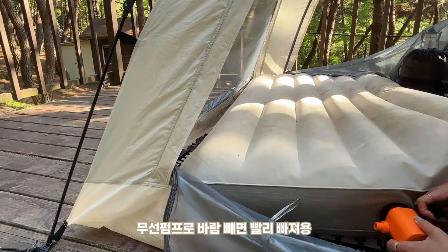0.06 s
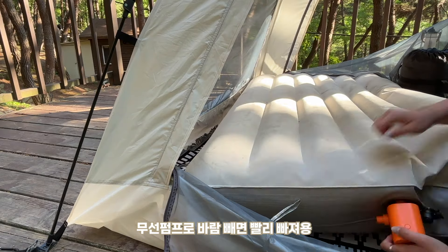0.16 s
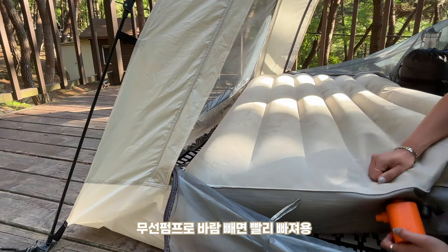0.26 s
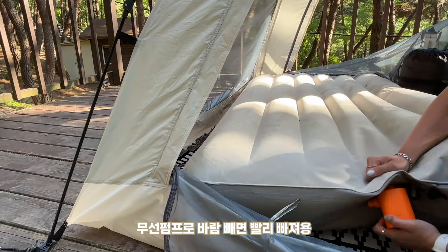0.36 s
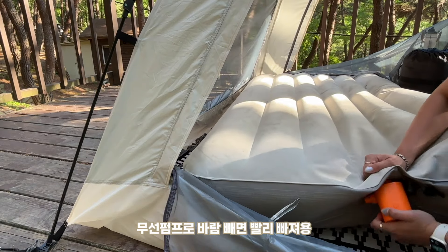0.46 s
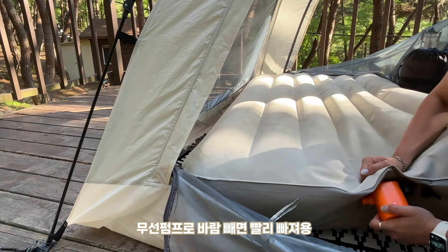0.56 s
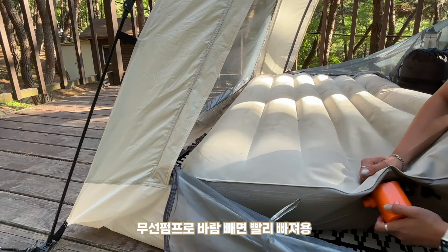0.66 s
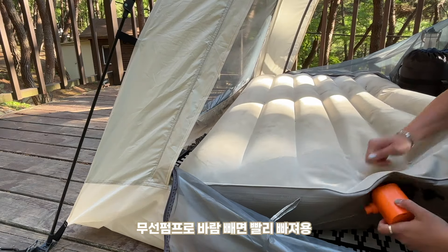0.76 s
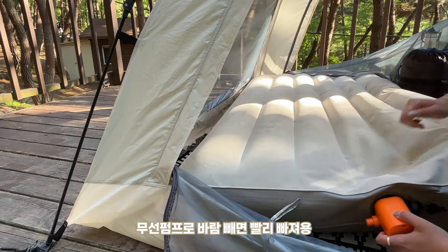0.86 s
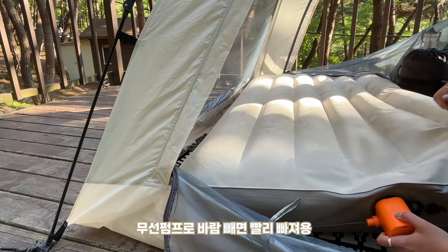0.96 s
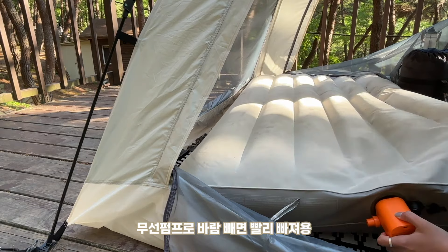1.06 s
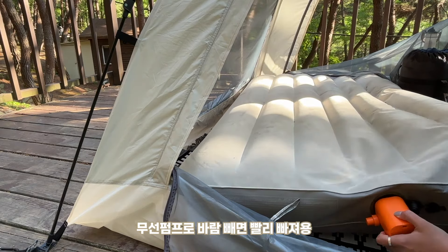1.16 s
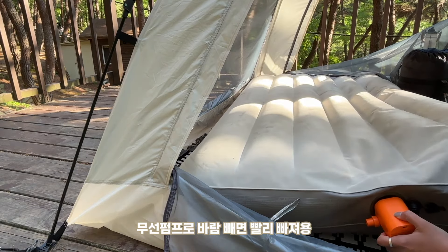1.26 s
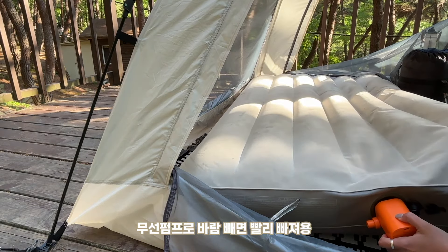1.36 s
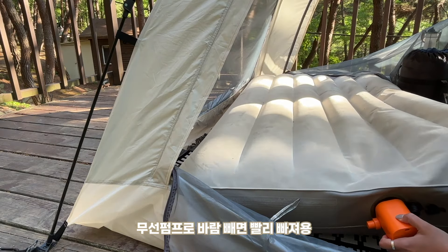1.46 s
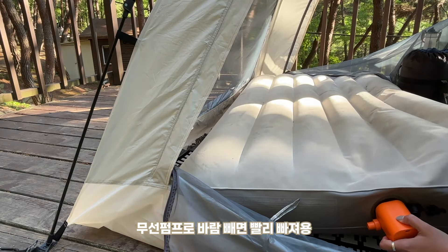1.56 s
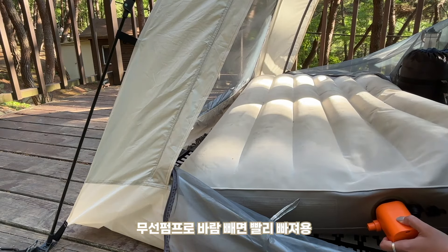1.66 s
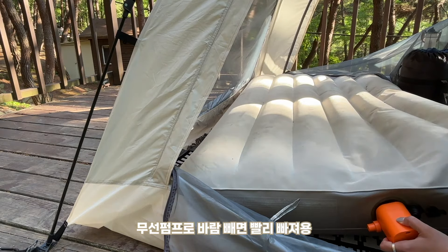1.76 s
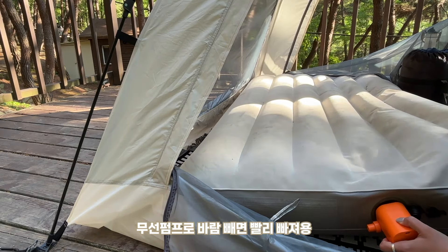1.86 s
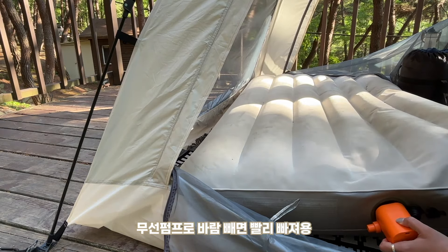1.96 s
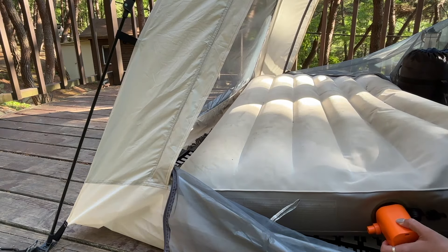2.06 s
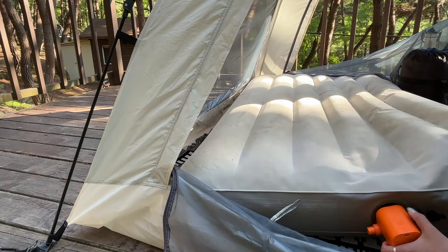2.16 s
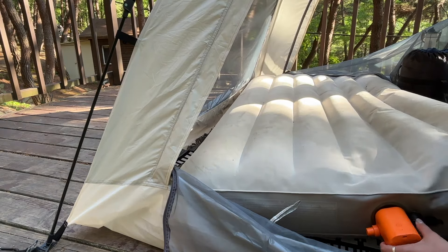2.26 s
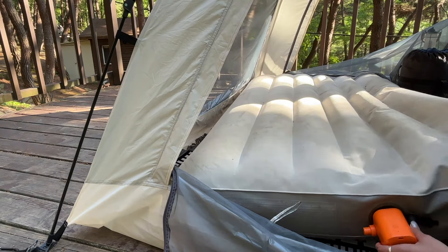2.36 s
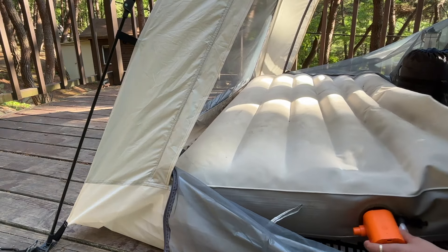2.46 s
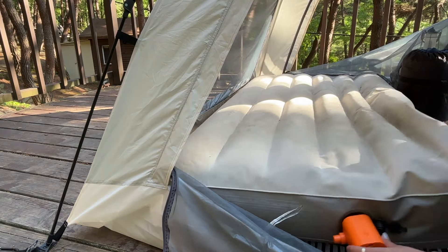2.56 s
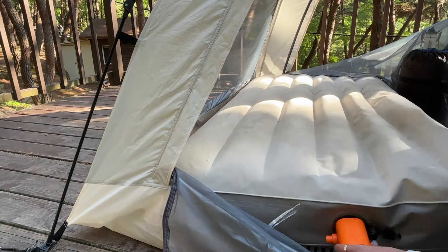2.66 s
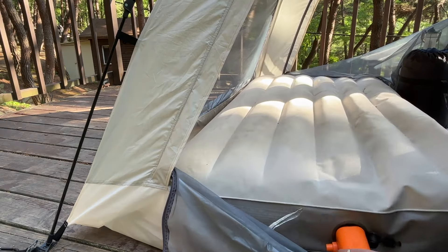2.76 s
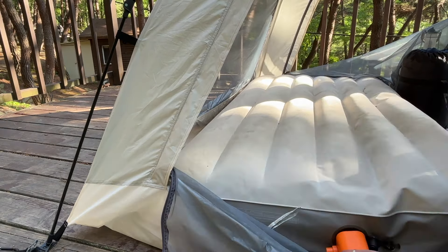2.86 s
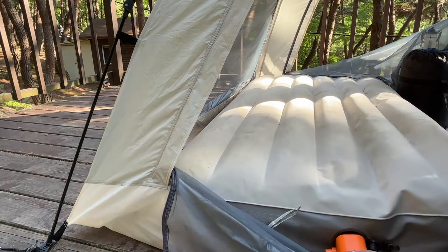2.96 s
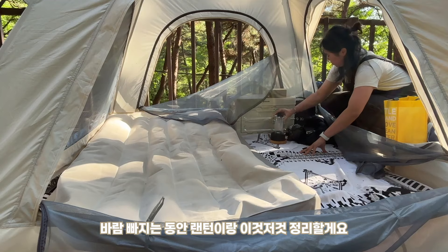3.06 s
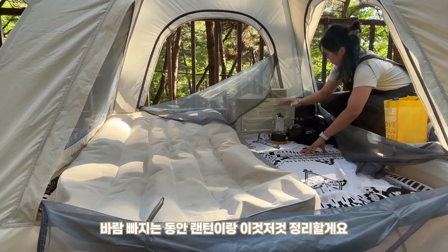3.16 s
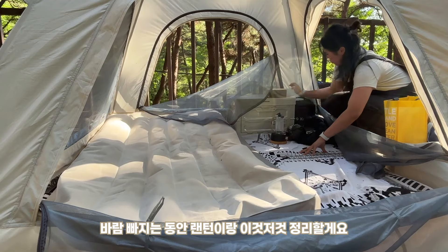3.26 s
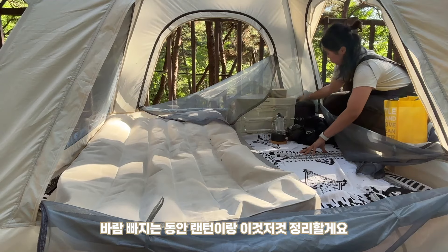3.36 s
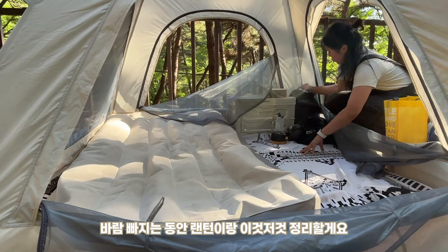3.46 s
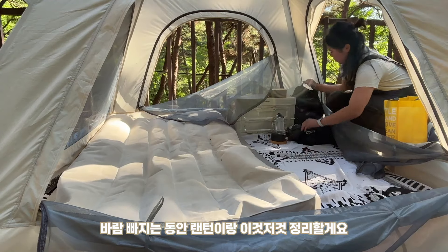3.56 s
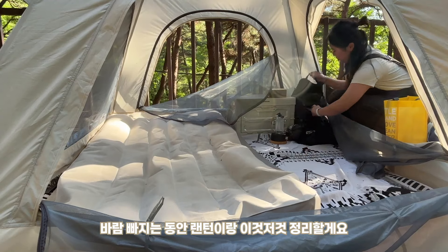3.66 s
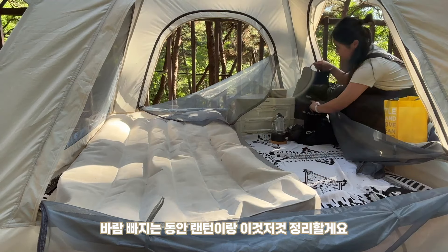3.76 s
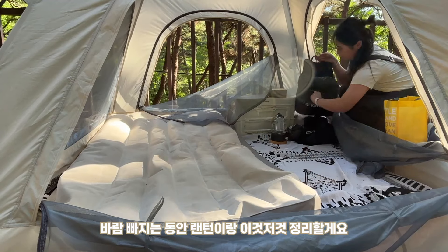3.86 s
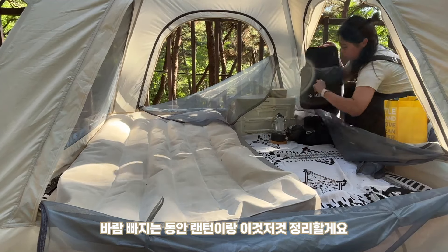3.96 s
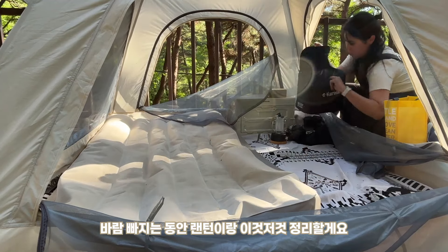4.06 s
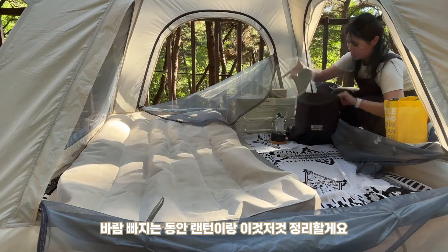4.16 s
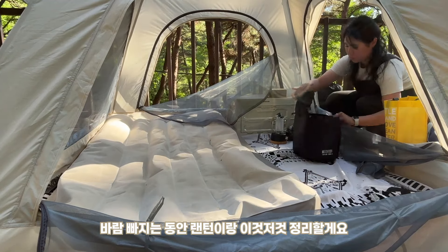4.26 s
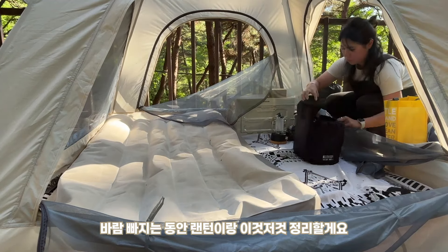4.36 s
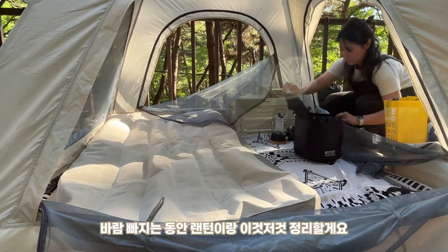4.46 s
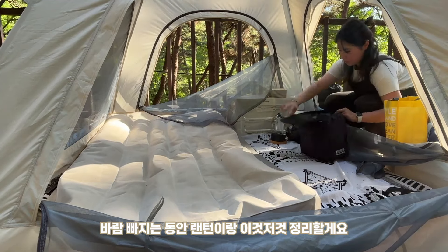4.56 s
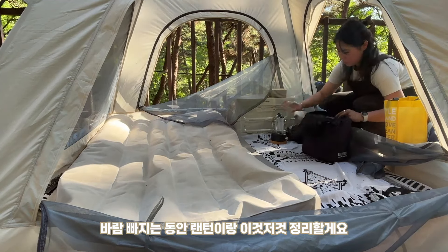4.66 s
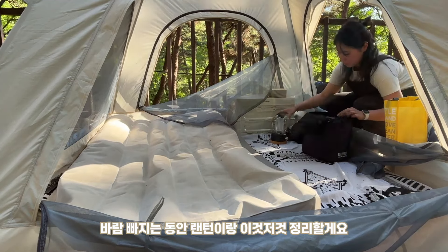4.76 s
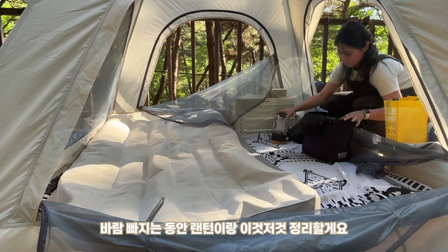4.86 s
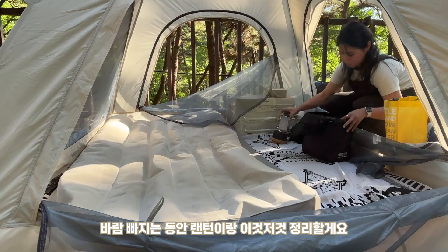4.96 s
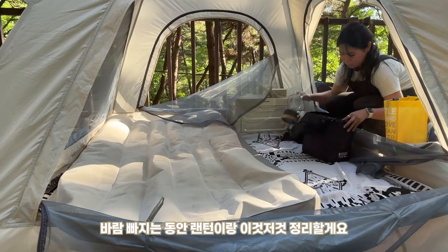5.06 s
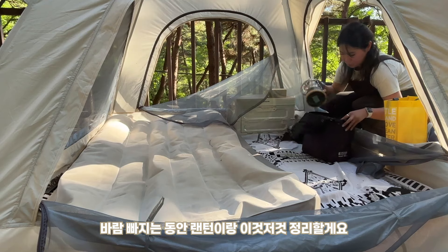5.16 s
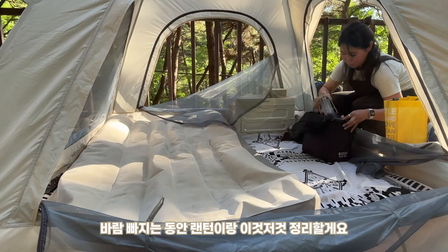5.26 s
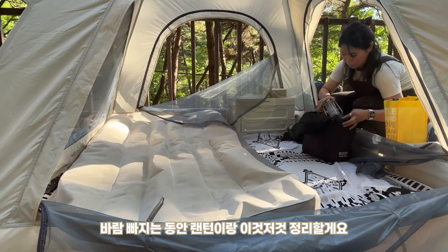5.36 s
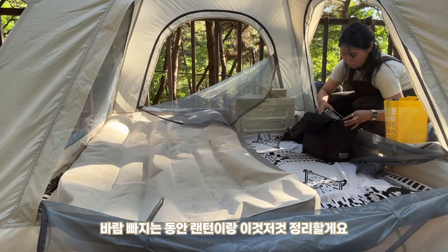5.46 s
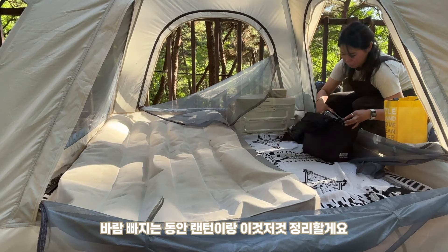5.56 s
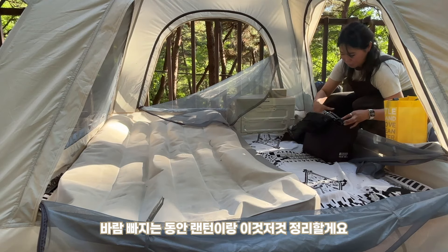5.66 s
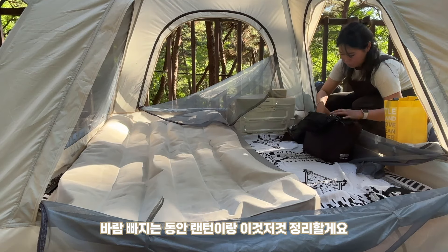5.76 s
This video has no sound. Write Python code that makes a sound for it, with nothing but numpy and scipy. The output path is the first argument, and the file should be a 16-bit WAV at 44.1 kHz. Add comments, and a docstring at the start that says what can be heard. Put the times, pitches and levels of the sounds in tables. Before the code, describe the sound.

In quiet woods, close by, hands rub and bump an air mattress and a pump nozzle clicks into the valve. The cordless pump starts, rising quickly to a shrill whine over a hum and hissing air. The sound then cuts to farther away, where the pump runs on steadily, a little lower and duller, while camping gear clicks and knocks a few times inside the tent.

```python
"""Inflating an air mattress

In quiet outdoor ambience a cordless pump is pressed onto the mattress valve, clicks into place and is
switched on. Its nine-bladed impeller spins up to a shrill whine over a hum and rushing air.
The scene jumps to later, farther from the pump, where it runs on steadily while camping gear
clicks and bumps as it is packed in the tent."""
import sys
import numpy as np
from scipy import signal
from scipy.fft import rfft, irfft, next_fast_len
from scipy.io import wavfile
from scipy.ndimage import uniform_filter1d, map_coordinates

SR = 44100
rng = np.random.default_rng(int(sys.argv[2]) if len(sys.argv) > 2 else 0)


def store_wav(level_fs):
    """Save 16-bit WAV to argv[1]."""
    pcm = np.round(np.clip(np.atleast_2d(level_fs), -1, 1) * 32767)
    wavfile.write(sys.argv[1], SR, pcm.T.astype(np.int16))


N = 256662
TIME = np.arange(N) / SR
BLADES, JUMP_S, TOP_HZ = 9, 3.069, 15750


def amp(db):
    return 10 ** (np.asarray(db) / 20)


def unit(x):
    return x / np.sqrt(np.mean(x ** 2) + 1e-20)


def along(points, hz):
    """Read an EQ curve of (Hz, dB) points on a log frequency axis."""
    points_hz, points_db = np.transpose(points)
    return np.interp(np.log(hz + 1), np.log(points_hz + 1), points_db)


def wobble(rate):
    """Smooth random modulation, rate knots a second."""
    coarse = np.linspace(0, TIME[-1], 4000)
    knots = rng.standard_normal(int(TIME[-1] * rate) + 4)
    return np.interp(TIME, coarse, map_coordinates(knots, [coarse * rate]))


def swell(peak_s, length_s):
    """A bell-shaped envelope that peaks at 1."""
    return np.exp(-(2 * (TIME - peak_s) / length_s) ** 2)


def filtered(x, response):
    """Zero-phase EQ; response gives the gain at each frequency."""
    size = next_fast_len(len(x) + 8192)
    return irfft(rfft(x, size) * response(np.fft.rfftfreq(size, 1 / SR)), size)[:len(x)]


def rush(colour, patchy_db):
    """Noise of rms 1 with patches of random gain; colour gives dB at each frequency."""
    spectrum = signal.stft(rng.standard_normal(N), nperseg=512)[2]
    patches = uniform_filter1d(rng.standard_normal(spectrum.shape), size=6, axis=0)
    patches = uniform_filter1d(patches, size=18, axis=1)
    noise = signal.istft(spectrum * amp(patchy_db * unit(patches)), nperseg=512)[1][:N]
    return unit(filtered(noise, lambda hz: amp(colour(hz))))


def resonance(centre_hz, width_hz):
    """Noise ringing in one narrow band."""
    return rush(lambda hz: -20 * np.log10(1 + ((hz - centre_hz) / width_hz) ** 2), patchy_db=0.6)


def tone(angle, flutter_db, flutter_rate):
    """A sine of rms 1 that the turbulent air makes flutter."""
    return unit(np.sin(angle + rng.uniform(0, 2 * np.pi)) * amp(flutter_db * wobble(flutter_rate)))


def add(track, s, sound):
    """Mix a sound into the track at time s."""
    part = track[round(s * SR):][:len(sound)]
    part += sound[:len(part)]


# Colour of the ambience bed: (frequency [Hz], gain [dB])
AMBIENCE_EQ = [(26, -77), (45, -56), (108, -3), (210, -3.5), (334, -9.5), (437, -5), (494, -4.5),
               (558, -11), (979, -10), (1310, -10), (1940, -11.5), (2540, -18.5), (4910, -28.5),
               (9510, -29.5), (15500, -42)]

def outdoors():
    """The soft, steady murmur of a wooded site."""
    return amp(-54.5 + 0.11 * wobble(4.92)) * rush(lambda hz: along(AMBIENCE_EQ, hz), patchy_db=1.8)


# Colour of skin on the cover: (frequency [Hz], gain [dB])
SWISH_EQ = [(1000, 1), (3500, -2.5), (7000, -2), (10000, -3), (15500, -6)]
# Slides of hand and nozzle: (peak time [s], length [s], level [dB])
STROKES = [(.24, 0.1, -59), (.295, 0.054, -53), (0.715, 0.15, -62.5)]

def rubbing():
    """Skin and nozzle swish over the mattress, above a rustle that fades as the hands settle."""
    rustle = amp(-63 - 5.5 * TIME)
    strokes = sum(amp(db) * swell(s, length) for s, length, db in STROKES)
    grain = amp(1.2 * wobble(90))
    return (rustle + strokes) * grain * rush(lambda hz: along(SWISH_EQ, hz), patchy_db=2)


# Dull hits on mattress and tent floor: (time [s], level [dB], pitch [Hz])
BUMPS = [(0.205, -21.5, 620), (.216, -35.5, 290), (.239, -39, 400), (.294, -31.5, 600), (.311, -33.5, 446),
         (.321, -37, 347), (.353, -32, 560), (3.095, -37, 164), (4.256, -32.5, 243), (5.299, -27.5, 360)]

def bumps(decay_cycles=11):
    """Soft contacts ring for only a few cycles, within a broad thud."""
    track, t = np.zeros(N), np.arange(SR // 5) / SR
    for s, db, pitch_hz in BUMPS:
        thud = filtered(rng.standard_normal(len(t)), lambda hz: hz ** 2 / (1 + (hz / pitch_hz) ** 5))
        body = 0.82 * np.sin(2 * np.pi * pitch_hz * t) + 0.36 * unit(thud)
        attack = 1 - np.exp(-t * pitch_hz * 2.4)
        add(track, s, amp(db - 60 * t * pitch_hz / decay_cycles) * attack * body)
    return track


# Modes of a thin plastic shell: (multiple of the lowest ring, level [dB])
SHELL_MODES = [(1, -2.5), (2.04, -7.5), (3.3, -11), (4.25, -6)]
# Clicks of nozzle, switch and gear:
# (time [s], level [dB], lowest ring [Hz], crack tilt [dB/octave], ring over crack [dB])
CLICKS = [(.2925, -32.5, 780, -11, -5), (.415, -48, 2940, -15, -3), (.491, -46, 1600, -15, -3),
          (0.8558, -21, 4500, -1.5, -7), (0.8572, -30, 1000, 1, -8), (2.0225, -32, 1700, -8, -12),
          (4.259, -26.5, 1500, -11, -2), (4.781, -27.5, 2880, 0, 1), (4.911, -29.5, 5640, -18, -3),
          (5.298, -16, 764, -5.5, 3.5), (5.302, -23, 1575, 0, 1), (5.3793, -24.5, 3110, -25, -1.5),
          (5.765, -33, 3100, -12, 0)]

def clicks(near_t60_s=0.0092, tent_t60_s=0.027):
    """Each contact is a short crack that rings in thin plastic, for longer inside the tent."""
    track, t = np.zeros(N), np.arange(SR // 10) / SR
    attack = 1 - np.exp(-t / 0.00033)
    tail = amp(-26 - 60 * t / .06)  # reflections off nearby cloth and boards
    for s, db, ring_hz, tilt_db, ring_db in CLICKS:
        def crack_eq(hz):
            ratio = hz / ring_hz
            return amp(tilt_db * np.log2(1 + ratio)) * ratio ** 3 / (1 + ratio ** 3)
        crack = unit(filtered(rng.standard_normal(len(t)), crack_eq))
        ring = sum(amp(ring_db + mode_db) * np.sin(2 * np.pi * k * ring_hz * t)
                   for k, mode_db in SHELL_MODES if k * ring_hz < TOP_HZ)
        decay = amp(-60 * t / (near_t60_s if s < JUMP_S else tent_t60_s))
        add(track, s, amp(db) * attack * (decay + tail) * unit(crack + ring))
    return track


def insect(start_s=1.854, end_s=2.18, fade_s=.015, rasp_hz=80):
    """A faint insect in the trees: one short, fading trill of tiny rasps."""
    t = TIME - start_s
    gate = np.clip(np.minimum(t, end_s - TIME) / fade_s, 0, 1)
    rasps = amp(-40 * (t * rasp_hz % 1))
    return amp(-64.5 - 15 * np.maximum(t, 0)) * gate * unit(rasps * resonance(6100, width_hz=980))


def shaft_angle(shaft_hz, jitter):
    """Rotation of the motor, slightly unsteady under its load."""
    return 2 * np.pi * np.cumsum(shaft_hz * (1 + jitter * wobble(60))) / SR


def driven(speed, full_db, growth_db):
    """A fader that follows motor speed (0-1); growth_db steepens the rise."""
    return speed * amp(full_db + growth_db * (speed - 1))


# Resonances of the duct: (frequency [Hz], gain [dB])
DUCT_EQ = [(1900, -19), (2250, 3), (3100, 2.5), (3500, -3.5), (4200, -2.5), (4750, 3), (5020, -2.5),
           (5180, 1.5)]

def blade_whine(angle, shaft_hz):
    """The passing blades make a whine that climbs through the duct's resonances."""
    duct = amp(along(DUCT_EQ, BLADES * shaft_hz))
    return duct * tone(BLADES * angle, flutter_db=0.5, flutter_rate=250)


# Shaft overtones, close up: (multiple of the shaft rate, level [dB])
BUZZ_PARTIALS = [(2, -18.5), (3, -11.5), (4, -15), (5, -18), (6, -24.5), (7, -18.5), (8, -31)]
OUTLET_HZ, OUTLET_WIDTH_HZ = 830, 180

def shaft_buzz(angle, shaft_hz):
    """Each overtone swells as it climbs through the outlet's resonance."""
    buzz = np.zeros(N)
    for k, db in BUZZ_PARTIALS:
        boost_db = 14 * np.exp(-((k * shaft_hz - OUTLET_HZ) / OUTLET_WIDTH_HZ) ** 2)
        buzz += amp(db + boost_db) * tone(k * angle, flutter_db=1.5, flutter_rate=60)
    return buzz


# Brief ducks in the hum: (time [s], depth [dB])
HUM_DIPS = [(2.53, 5), (2.635, 9), (2.765, 5)]

def motor_hum(angle):
    """The shaft's fundamental, one cycle a turn."""
    dips_db = sum(db * swell(s, length_s=0.045) for s, db in HUM_DIPS)
    return amp(-dips_db) * tone(angle, flutter_db=-0.1, flutter_rate=38)


# Colour of the outgoing air: (frequency [Hz], gain [dB])
EXHAUST_EQ = [(120, -52), (300, -11), (600, -2.5), (790, 5.5), (1000, 0.5), (1450, 0.5), (1950, -9.5),
              (2300, -4.5), (3500, -26), (6000, -38)]

def exhaust():
    """Air leaves the outlet in a midrange rush."""
    return rush(lambda hz: along(EXHAUST_EQ, hz), patchy_db=0.5)


# Housing resonances: (centre [Hz], width [Hz], close gain [dB], distant gain [dB])
HOUSING_BANDS = [(5410, 430, 7, 4.5), (7420, 470, -5, 7.5), (10180, 260, -1, 6), (11270, 500, 9.5, 0.5),
                 (13200, 560, 7, 14)]

def housing_db(hz, close):
    """The cavities of the pump housing colour the air noise."""
    return sum((near_db if close else far_db) / (1 + (2 * (hz - centre) / width) ** 2)
               for centre, width, near_db, far_db in HOUSING_BANDS)


# Colour of the incoming air: (frequency [Hz], gain [dB])
INTAKE_EQ = [(1500, -48), (2900, -4.5), (3700, -11), (4600, -6.5), (5400, -4), (6700, -5.5), (8300, -7.5),
             (10000, -13), (10700, -14.5), (12300, -15.5), (14500, -20), (15700, -15.5)]
# Ringing cavities: (centre [Hz], width [Hz], level relative to the hiss [dB])
CAVITIES = [(7510, 170, -10), (9150, 320, -12), (10060, 160, -14)]

def intake():
    """Air hisses in at the vents and keeps narrow cavities ringing, wavering in strength."""
    hiss = rush(lambda hz: along(INTAKE_EQ, hz) + housing_db(hz, close=True), patchy_db=2.0)
    return hiss + sum(amp(db + 1.6 * wobble(12)) * resonance(hz, width) for hz, width, db in CAVITIES)


# Breathy whistles at the vents: (peak time [s], length [s], centre [Hz], level [dB])
FLARES = [(2.413, 0.27, 7540, -39.5), (2.44, 0.17, 9280, -34), (2.43, 0.092, 10060, -38.5),
          (2.555, 0.046, 10200, -34.5), (2.56, 0.068, 11300, -46), (2.7, .13, 7300, -34.5),
          (2.88, 0.42, 7280, -39.5), (3.04, 0.18, 9250, -41), (3.02, 0.18, 10330, -43),
          (3.0, .13, 13300, -48)]

def vent_flares():
    """The hand shifts over the vents and cavities flare up."""
    return sum(amp(db) * swell(s, length) * resonance(hz, width_hz=250) for s, length, hz, db in FLARES)


def pump_near(start_s=2.008, run_up_s=.425, full_hz=580.6, knee=7, turn_away_s=2.7):
    """The motor gains speed evenly until the air load levels it off; pitch and level follow."""
    run_up = np.maximum(TIME - start_s, 0) / run_up_s
    speed = run_up / (1 + run_up ** knee) ** (1 / knee)
    shaft_hz = full_hz * speed
    angle = shaft_angle(shaft_hz, jitter=0.00055)
    # Lowered and turned away, the pump loses whine and hiss as its outlet comes to face the listener.
    away_s = np.maximum(TIME - turn_away_s, 0)
    mix = driven(speed, -23.5, growth_db=44.5) * amp(-15.5 * away_s) * blade_whine(angle, shaft_hz)
    mix += driven(speed, -35, growth_db=36) * shaft_buzz(angle, shaft_hz)
    mix += driven(speed, -32.5, growth_db=49) * motor_hum(angle)
    mix += driven(speed, -41, growth_db=22) * amp(5 * away_s) * exhaust()
    mix += driven(speed, -45.5, growth_db=0) * resonance(OUTLET_HZ, OUTLET_WIDTH_HZ)
    mix += driven(speed, -33, growth_db=20.5) * amp(-15 * away_s) * intake()
    mix += vent_flares()
    flow = 1 - np.exp(-(speed / 0.21) ** 2)  # air begins to rush near a fifth of full speed
    return flow * mix


# Shaft overtones, farther off: (multiple of the shaft rate, level [dB])
FAR_PARTIALS = [(2, -20.5), (3, -16.5), (4, -24), (6, -16), (8, -7), (9, -0.5), (11, -27.5), (12, -23),
                (13, -33), (14, -37), (15, -17), (17, -30), (22, -40)]
# Colour of the air, farther off: (frequency [Hz], gain [dB])
FAR_AIR_EQ = [(100, -33), (250, -14), (480, -7.5), (790, -0.5), (1050, -2), (1600, 1), (2000, -5),
              (2350, -1.5), (2800, -8), (3400, -7), (4200, -6), (6000, -15), (8800, -19), (15700, -21.5)]

def pump_far():
    """Later the pump turns slower and sounds duller, shaded by the mattress."""
    blade_hz = 4975.5 + 18 * swell(4.38, length_s=.85)  # the load eases briefly and the whine rises
    angle = shaft_angle(blade_hz / BLADES, jitter=0.00041)
    hum = tone(angle, flutter_db=0, flutter_rate=22)
    whine = sum(amp(db) * tone(k * angle, flutter_db=0.33, flutter_rate=45) for k, db in FAR_PARTIALS)
    air = rush(lambda hz: along(FAR_AIR_EQ, hz) + housing_db(hz, close=False), patchy_db=0.6)
    return amp(-40.4) * hum + amp(-36.5) * (whine + air)


def scene():
    """A mono mix with a 4 ms crossfade from the close pump to the distant one."""
    later = np.clip((TIME - JUMP_S) / .004 + .5, 0, 1)
    pump = (1 - later) * pump_near() + later * pump_far()
    mono = pump + clicks() + bumps() + rubbing() + insect() + outdoors()
    return np.array([mono, mono])


def record(dry):
    """Master EQ: a low cut on the deep bass and a brick wall at the top."""
    thin = signal.sosfilt(signal.butter(4, 105, "highpass", fs=SR, output="sos"), dry)
    return np.array([filtered(channel, lambda hz: hz < TOP_HZ) for channel in thin])


dry = scene()
out = record(dry)
store_wav(out)
```